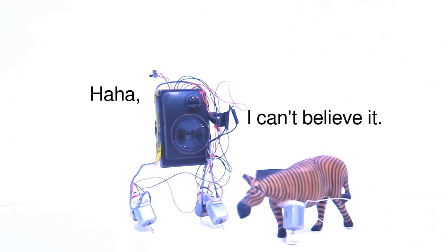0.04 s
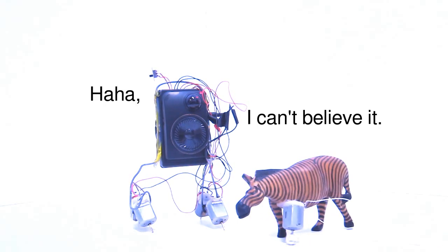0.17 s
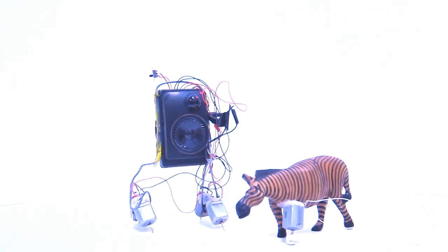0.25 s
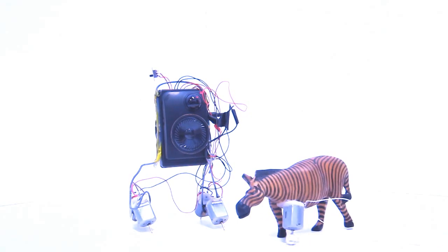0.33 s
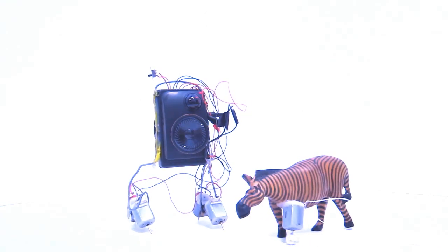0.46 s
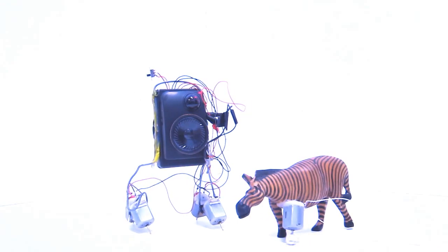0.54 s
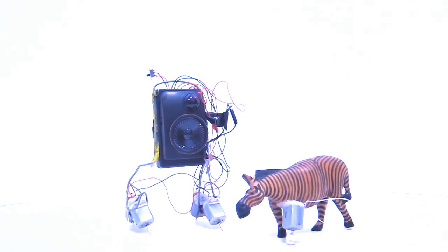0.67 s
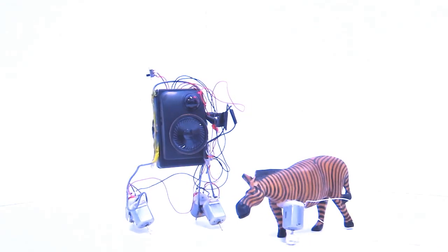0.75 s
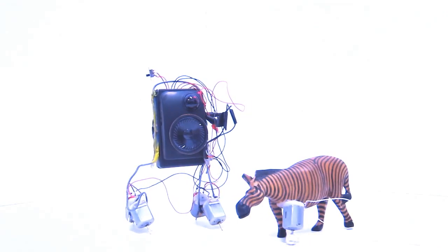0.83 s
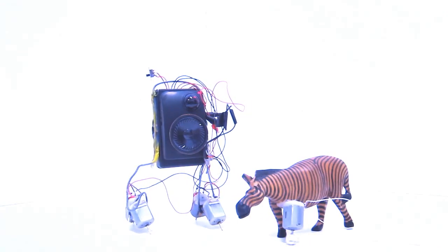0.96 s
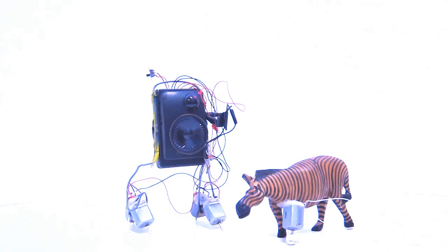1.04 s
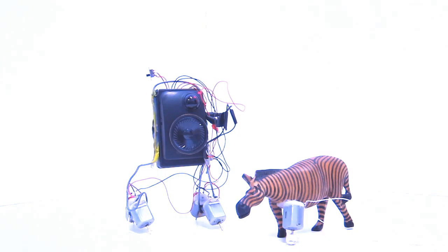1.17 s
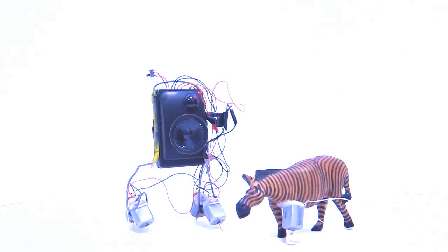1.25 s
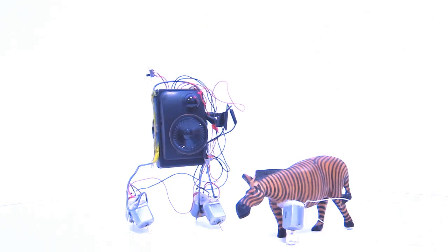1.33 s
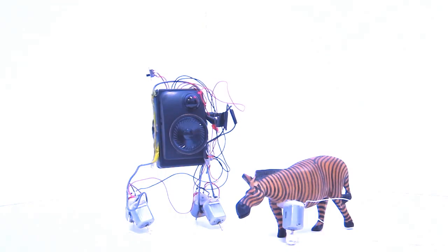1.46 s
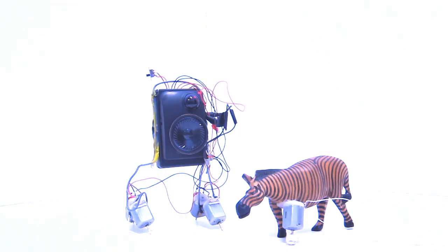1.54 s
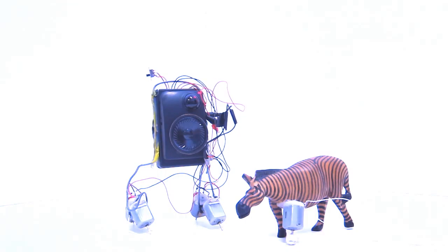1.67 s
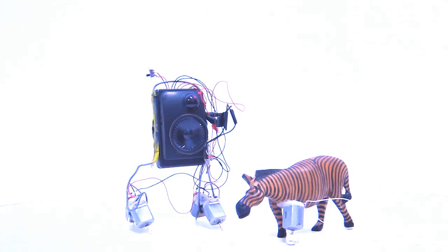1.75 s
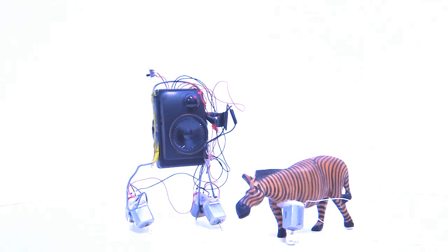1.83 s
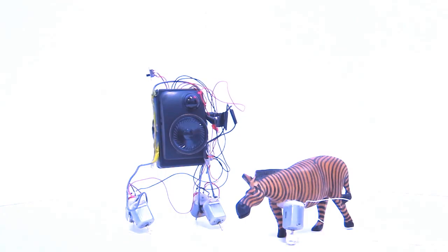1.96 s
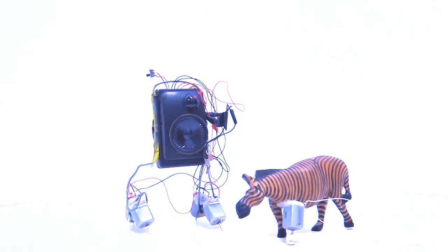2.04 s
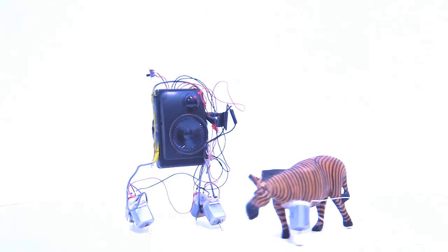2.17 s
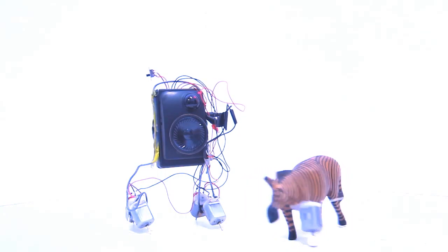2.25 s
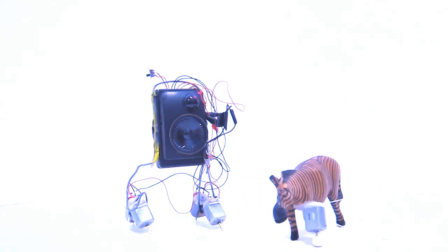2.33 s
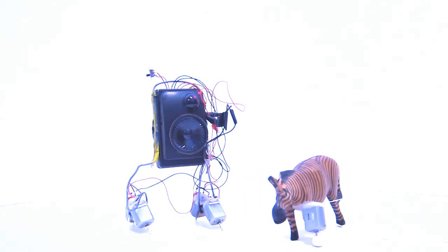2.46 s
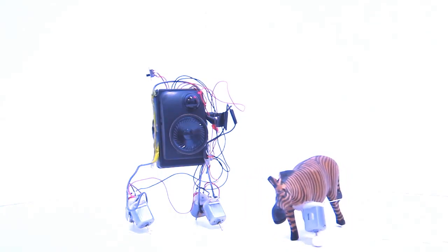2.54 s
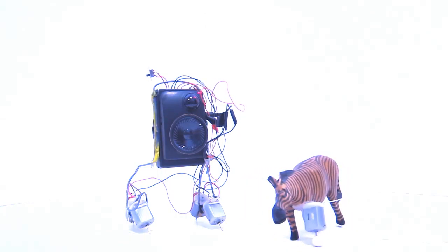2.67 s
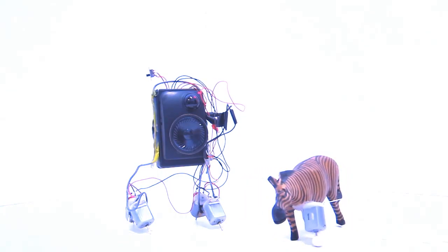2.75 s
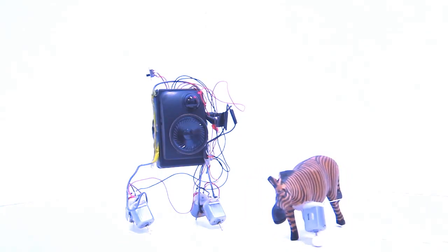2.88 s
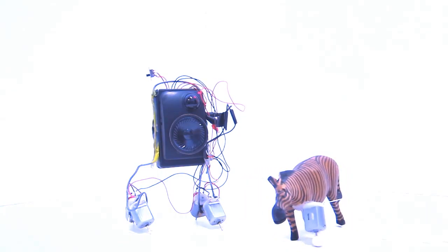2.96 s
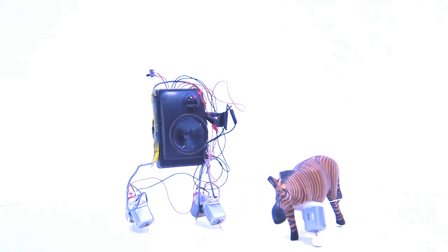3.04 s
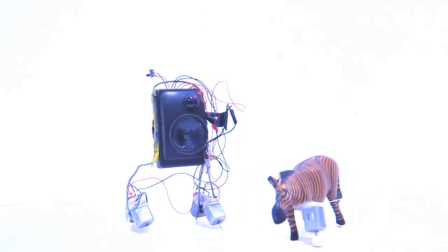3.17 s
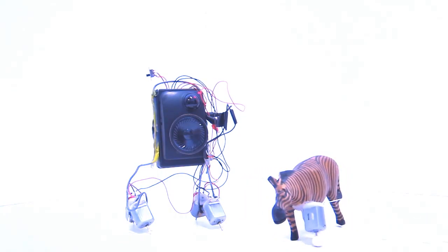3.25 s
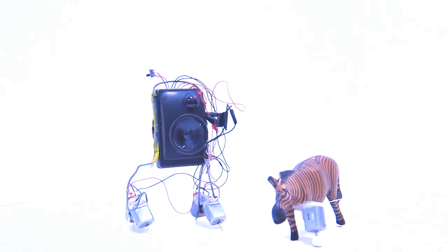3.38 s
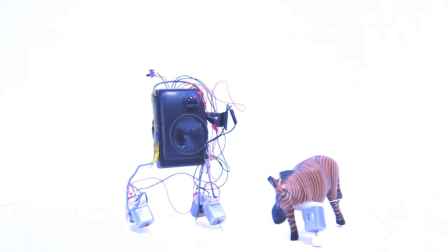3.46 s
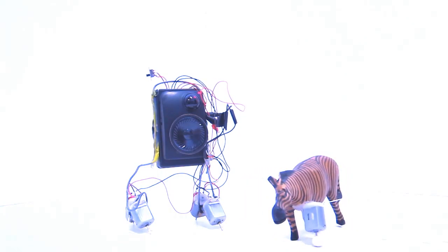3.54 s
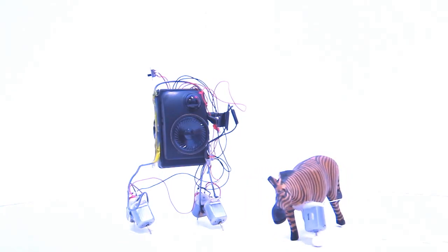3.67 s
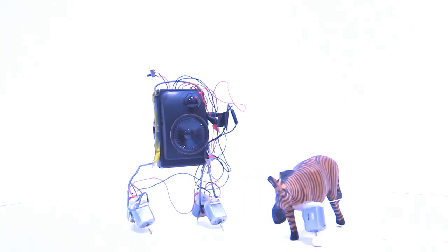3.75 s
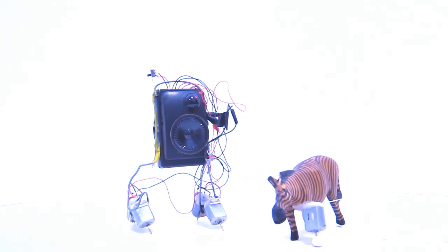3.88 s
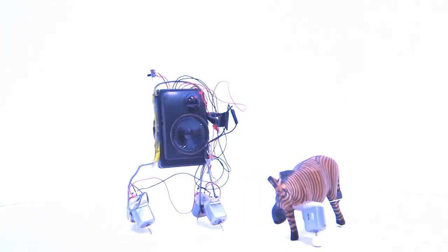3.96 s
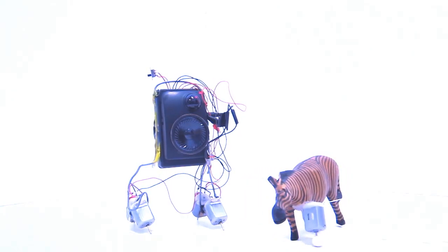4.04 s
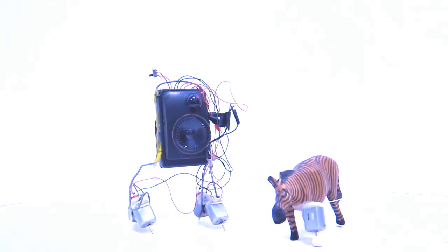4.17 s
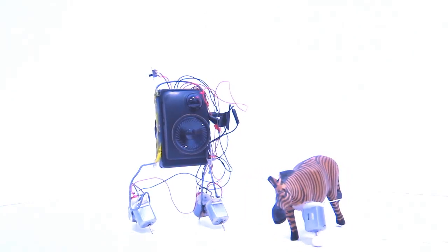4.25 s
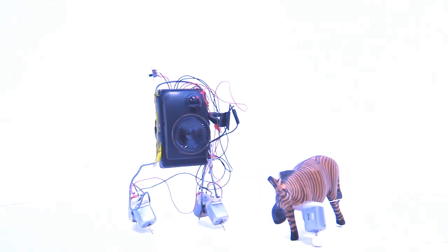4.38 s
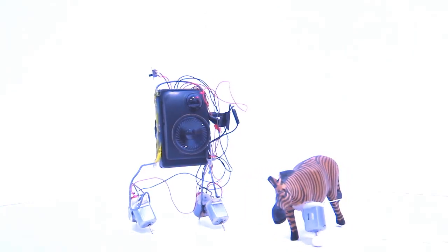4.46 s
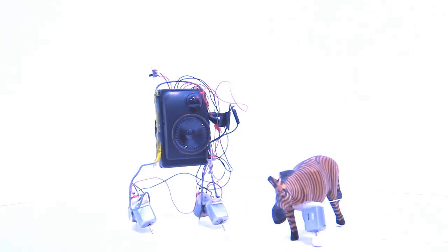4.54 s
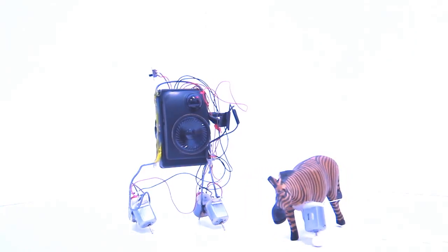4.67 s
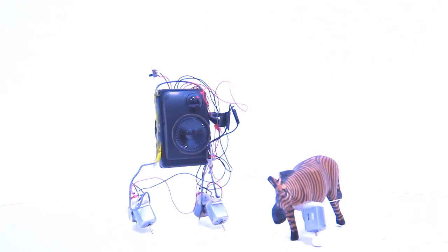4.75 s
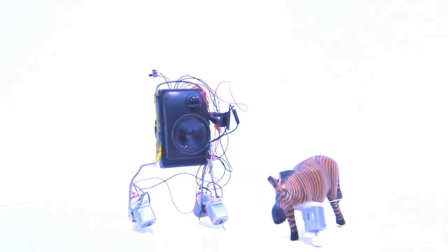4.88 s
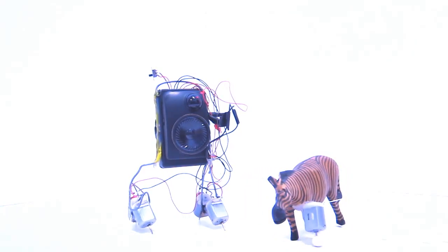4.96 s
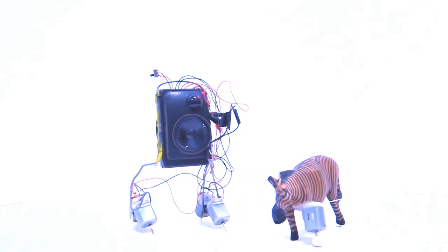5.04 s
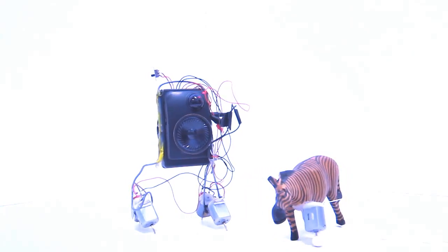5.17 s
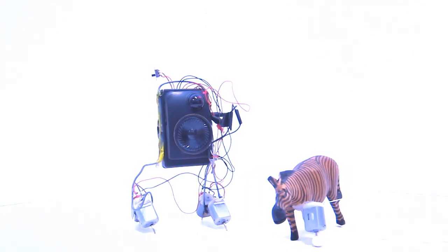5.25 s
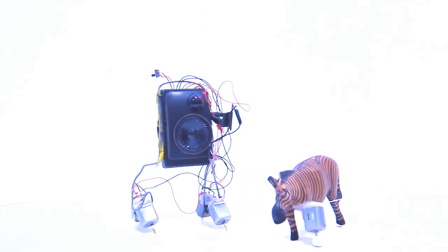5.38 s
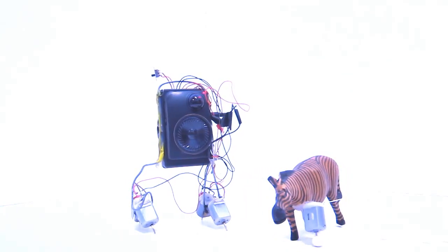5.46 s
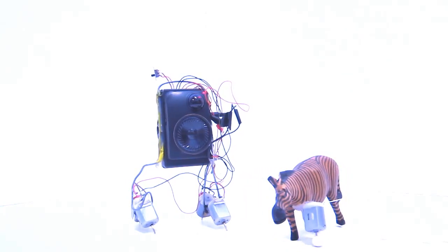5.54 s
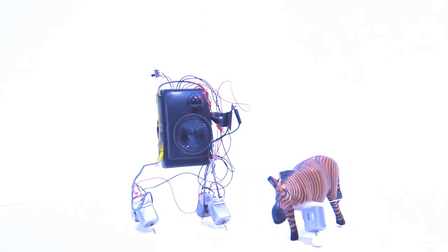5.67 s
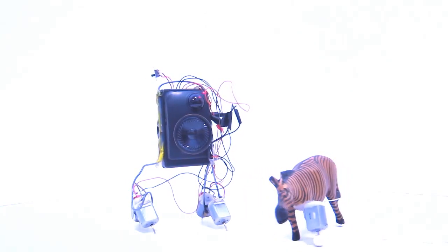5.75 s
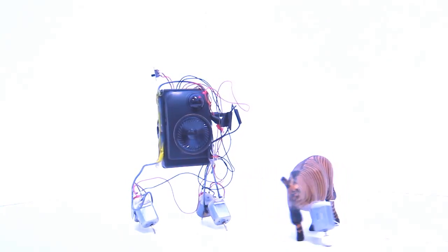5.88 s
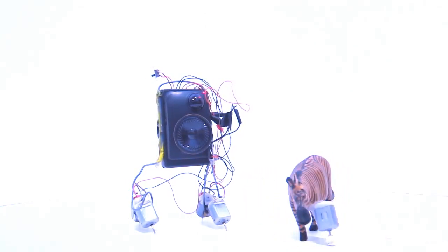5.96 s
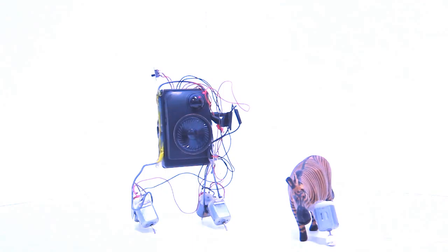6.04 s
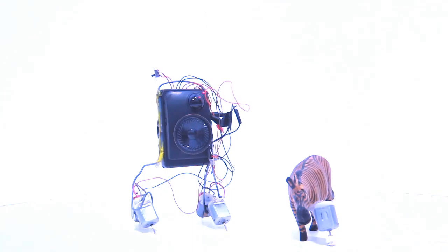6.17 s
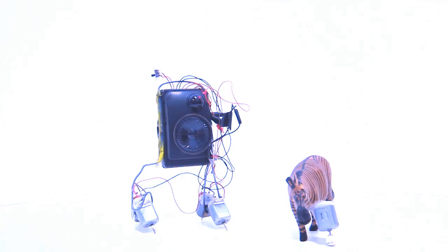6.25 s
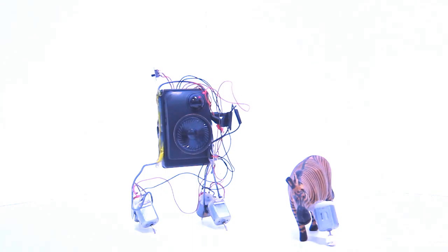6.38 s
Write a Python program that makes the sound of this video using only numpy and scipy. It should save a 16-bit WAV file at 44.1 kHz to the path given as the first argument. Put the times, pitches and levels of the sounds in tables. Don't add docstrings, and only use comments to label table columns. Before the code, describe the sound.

Close stereo microphones in a small, quiet room with a short echo. Right away, near 0.07 s, a hard plastic rap booms on a hollow table as a motor whirr cuts off. From about 0.4 to 0.6 s a motor buzzes while its foot rattles in dense, dry knocks, slowing into a few stray taps. Then quiet: soft air hiss, a very faint far fan with thin wavering whines, a tiny dull click at 1.6 s. From 2.14 to 2.57 s a toy animal hops and skids, giving uneven hard raps, scrapes and two weaker last taps. Quiet again. A very brief buzzing rattle comes at 3.65 s, another at 4.1 s, and a longer one from 4.95 to 5.12 s. Small wire ticks at 5.26 s and a faint squeak at 5.5 s. From 5.8 to 6 s the animal whirrs through a quick run of raps, then hiss until 6.4 s.

```python
import sys
import numpy as np
from scipy import signal
from scipy.fft import rfft, irfft
from scipy.io import wavfile
from scipy.ndimage import uniform_filter1d

SR = 44100
rng = np.random.default_rng(int(sys.argv[2]) if len(sys.argv) > 2 else 0)


def invert_db(level):
    return 10 ** (np.asarray(level, dtype=float) / 20)


def to_wav(sig):
    pcm = np.clip(np.atleast_2d(sig), -1, 1) * 32767
    pcm = np.round(pcm).astype(np.int16)
    wavfile.write(sys.argv[1], SR, pcm.T)


N = 282681


def animal():
    # start in seconds, rap level in dB, table boom level in dB.
    hops = [(0.0673, -2.5, -12), (.099, -38.5, -17.5), (2.140, -39, -34), (2.1738, -15.5, -11.5),
            (2.195, -23, -19.5), (2.2174, -13.5, -12), (2.24, -42, -23), (2.2599, -9, -8), (2.306, -10, -9),
            (2.4536, -20, -17), (2.5662, -29.5, -24.5), (5.8222, -20, -14), (5.846, -27, -18),
            (5.870, -25, -16.5), (5.8946, -17, -16), (5.924, -13.5, -11), (5.980, -35.5, -24)]
    # frequency in Hz, level in dB, t60 in seconds.
    shell_modes = [(734, 3.5, 0.013), (990, -18, 0.017), (1228, -17, 0.038), (1600, -10.5, 0.0076),
                   (1955, -9, 0.012), (2530, -7, 0.019), (2900, -3, 0.013), (3400, -8, 0.007)]
    # frequency in Hz, level in dB, t60 in seconds.
    table_modes = [(173, -2, 0.069), (196.1, 0, 0.14), (235.3, -8, 0.11), (299.6, -7.5, 0.21),
                   (378, 2, 0.067), (426, -16, 0.12), (495, -11, 0.082), (597, -21.5, 0.16),
                   (100, -44, .15)]
    # power on, full speed, power off in seconds, whirr in dB, table rumble in dB.
    hop_runs = [
        (-.02, .008, 0.032, -36, -27),
        (.07, .075, 0.068, -50, -29.5),
        (5.775, 5.812, 5.985, -46, -43),
    ]
    skid_runs = [
        (2.12, 2.142, 2.223, -43.5, -40.5),
        (2.2, 2.212, 2.224, -39, -50),
        (2.258, 2.268, 2.285, -44, -46),
        (2.3, 2.308, 2.357, -55.5, -44),
    ]
    # frequency in Hz, level in dB per Hz.
    whirr = [(500, -35.5), (800, -12), (1300, -8.5), (2200, -7.5), (2500, -10), (3300, -6), (4700, -18),
             (5500, -12), (7000, -19.5), (10800, -21.5), (15500, -33)]
    # frequency in Hz, width in Hz, level in dB over the whirr.
    motor_case = [(2500, 180, 17), (3050, 500, 6), (4200, 1200, 7)]
    # frequency in Hz, width in Hz, level in dB over the whirr.
    skid_case = [(2520, 180, 8.5), (4270, 1900, 4), (6700, 1360, 5.5)]
    soft_hz, harder_hz = 1175, 6400
    events = [(s, rap_db, boom_db, soft_hz + harder_hz * invert_db(rap_db)) for s, rap_db, boom_db in hops]
    out = blows(events, shell_modes, table_modes, snap_db=2.5, snap_turns=5.44, crackle_db=-12,
                chatter=2.0, boom_s=0.0025, echo_db=0.5)
    out += motor(hop_runs, whirr, motor_case, table_modes, turns_hz=160.0, rough=0.26,
                 sag_db=-6.5, coast_db_per_s=394)
    out += motor(skid_runs, whirr, skid_case, table_modes, turns_hz=148.4, rough=0.27,
                 sag_db=-5.0, coast_db_per_s=356)
    return out


def box():
    # start in seconds, rap level in dB, table boom level in dB.
    near_knocks = [(.398, -16, -13.5), (.4064, -15.5, -18.5), (.429, -9, -7.5), (.4427, -16, -18.5),
                   (.5407, -21, -19.5), (.5652, -18.5, -13), (.6093, -25, -23.5)]
    far_knocks = [(3.6506, -42, -34), (3.667, -31, -23), (4.1032, -41, -29), (4.118, -17.5, -16),
                  (4.129, -29, -20.5), (4.949, -26, -25), (4.9581, -24.5, -19.5), (4.9837, -12.5, -17),
                  (4.9969, -22, -13), (5.1093, -15, -20)]
    # first, strongest, last knock in seconds, rap level in dB, table boom in dB.
    near_rolls = [
        (.4537, .49, .527, -12, -12),
    ]
    far_rolls = [
        (3.6761, 3.683, 3.704, -10, -18.5),
        (4.139, 4.144, 4.166, -8, -14.5),
        (5.013, 5.045, 5.122, -8.5, -11),
    ]
    # power on, full speed, power off in seconds, whirr in dB, table rumble in dB.
    knock_runs = [
        (.37, .41, 0.55, -31.5, -36),
        (3.62, 3.675, 3.707, -38, -42),
        (4.05, 4.145, 4.157, -27, -32),
        (4.92, 4.99, 5.085, -25.5, -38),
    ]
    # frequency in Hz, level in dB, t60 in seconds.
    near_shell = [(1036, -16, 0.04), (1647, -9, 0.02), (1973, 4.5, 0.012), (2130, -0.5, 0.02),
                  (2530, -8.5, 0.025), (3360, -8.5, 0.016), (4580, -6.5, 0.0072)]
    far_shell = [(902, -12.5, 0.045), (1817, 5.5, 0.016), (2140, -6.5, 0.018), (2530, 3.5, 0.014),
                 (2920, -7, 0.027), (3590, -11, 0.015), (4920, 2.5, 0.0067)]
    # frequency in Hz, level in dB, t60 in seconds.
    near_table = [(181.6, -16, 0.11), (214, -13.5, 0.16), (308, -10.5, 0.11), (347.7, 3, 0.055),
                  (548, -14.5, 0.06), (718, -17, 0.031)]
    far_table = [(56, -40, 0.071), (105, -2.5, 0.08), (158.5, -2, 0.11), (216, -2.5, 0.051),
                 (329.7, -2.5, 0.077), (516, -4.5, 0.026)]
    # frequency in Hz, level in dB per Hz.
    whirr = [(410, -7), (700, -6), (1190, -9.5), (1830, -13.5), (2690, -10.5), (4030, -19.5), (4640, -22),
             (6680, -24.5), (8110, -38), (9720, -27), (15500, -45)]
    # frequency in Hz, width in Hz, level in dB over the whirr.
    motor_case = [(10500, 600, 3)]
    near_hard_hz, far_hard_hz = 4760, 5960
    near = [*near_knocks, *rolled(near_rolls, turn_s=.0104, jitter_s=.0006,
                                  enter_db=-1.0, leave_db=-4.5, uneven_db=3.5)]
    far = [*far_knocks, *rolled(far_rolls, turn_s=.0107, jitter_s=.0007,
                                enter_db=-2.0, leave_db=-36.5, uneven_db=2.5)]
    out = blows([(*knock, near_hard_hz) for knock in near], near_shell, near_table, snap_db=-10.5,
                snap_turns=5.7, crackle_db=7.0, chatter=4.6, boom_s=0.0019, echo_db=-2.5)
    out += blows([(*knock, far_hard_hz) for knock in far], far_shell, far_table, snap_db=-5.0,
                 snap_turns=13.8, crackle_db=1.5, chatter=0.69, boom_s=0.00022, echo_db=-4)
    out += motor(knock_runs[1:], whirr, motor_case, far_table, turns_hz=94.1, rough=0.56,
                 sag_db=-7.5, coast_db_per_s=230)
    out += motor(knock_runs[:1], whirr, [], near_table, turns_hz=93.7, rough=0.33,
                 sag_db=-6, coast_db_per_s=230.5)
    return out


def rolled(rolls, turn_s, jitter_s, enter_db, leave_db, uneven_db):
    out = []
    chances = rng.standard_normal((len(rolls), 12, 3))
    for (first, top, last, rap_db, boom_db), chance in zip(rolls, chances):
        for s, (a, b, c) in zip(np.arange(first, last + turn_s / 2, turn_s), chance):
            if s < top:
                db = enter_db * ((top - s) / (top - first)) ** 2
            else:
                db = leave_db * ((s - top) / (last - top)) ** 2
            start_s = s + jitter_s * a * (s > first)
            out.append((start_s, rap_db + db + uneven_db * b, boom_db + 0.45 * db + uneven_db * c))
    return out


def blows(events, shell, table, snap_db, snap_turns, crackle_db, chatter, boom_s, echo_db):
    out, t = np.zeros(N), np.arange(900) / SR
    echo = np.cos(2 * np.pi * 235 * (t - .0105)) * np.exp(-((t - .0115) / 0.0041) ** 2)
    chance = rng.random((len(events), 16, 3))
    crackle_shape = np.exp(-t / 0.0036) * (1 - np.exp(-t / 0.0043)) / 2
    crackle = rng.standard_normal((len(events), 900)) * crackle_shape
    for (s, rap_db, boom_db, hard_hz), c, hiss in zip(events, chance, crackle):
        u = t * hard_hz / snap_turns
        snap = np.sin(2 * np.pi * 1.89 * np.sqrt(u)) * np.exp(-u)
        touches = chatter * hiss ** 3 + (t == 0)
        rap = signal.fftconvolve(ring(shell, 0.0038, c), touches / np.linalg.norm(touches))
        soft = signal.butter(3, min(hard_hz, 15000), fs=SR, output="sos")
        contact = signal.sosfilt(soft, invert_db(snap_db) * snap + invert_db(crackle_db) * hiss)
        add(out, s, invert_db(rap_db - 0.5) * contact)
        add(out, s, invert_db(rap_db - 2) * rap)
        add(out, s, invert_db(boom_db + 3.0) * ring(table, boom_s, c[8:]))
        add(out, s, invert_db(boom_db + echo_db) * echo)
    return out


def ring(modes, rise_s, chance):
    t = np.arange(SR // 3) / SR
    x = np.zeros(len(t))
    for (hz, db, t60_s), (a, b, c) in zip(modes, chance):
        decay = invert_db(db + 9.1 * (c - .5) - 60 * t / t60_s)
        x += decay * np.sin(2 * np.pi * (hz * (1 + 0.1 * (a - .5)) * t + b))
    x = x * (1 - np.exp(-t / rise_s))
    return x / abs(x).max()


def motor(runs, whirr, case, table, turns_hz, rough, sag_db, coast_db_per_s):
    wander = uniform_filter1d(rng.standard_normal(N), size=400)
    turns = np.cumsum(turns_hz * (1 + 3 * wander)) / SR
    brush = coloured(whirr)
    hiss = brush.copy()
    for hz, width_hz, db in case:
        hiss += invert_db(db) * resonate(resonate(brush, hz, width_hz), hz, width_hz)
    hiss *= 1 - rough + 1.72 * rough * np.cos(np.pi * turns) ** 4
    push = coloured([(30, -11), (80, -1.5), (600, -18.0), (1200, -36.5), (20000, -77.5)])
    rumble = evened(sum(invert_db(db) * resonate(push, hz, 9.7 / t60_s) for hz, db, t60_s in table))
    hiss_gain = running(runs, column=3, start_db=-37.5, sag_db=sag_db, coast_db_per_s=coast_db_per_s)
    rumble_gain = running(runs, column=4, start_db=-19, sag_db=0, coast_db_per_s=0.9 * coast_db_per_s)
    return invert_db(1.5) * hiss_gain * hiss + invert_db(5.0) * rumble_gain * rumble


def running(runs, column, start_db, sag_db, coast_db_per_s):
    t, out = np.arange(N) / SR, np.zeros(N)
    for row in runs:
        on, full, off = np.sort(row[:3])
        levels_db = [start_db, 0, sag_db, sag_db - coast_db_per_s]
        shape_db = np.interp(t, [on, full, off, off + 1], levels_db, -150, -150)
        out += invert_db(row[column] + shape_db)
    return uniform_filter1d(out, size=350)


def ticks():
    # start in seconds, level in dB, frequency in Hz, decay length in seconds.
    wire_ticks = [
        (1.614, -35, 1450, .0015),
        (5.257, -32, 1300, .001),
        (5.485, -48, 2260, .04),
        (.685, -60, 11400, .02),
    ]
    out, t = np.zeros(N), np.arange(4000) / SR
    for s, db, hz, length_s in wire_ticks:
        shape = np.exp(-t / length_s) * (1 - np.exp(-4 * t / length_s))
        add(out, s, invert_db(db) * np.sin(2 * np.pi * hz * t) * shape)
    return out


def spread(x):
    # frequency in Hz, level in dB.
    scatter_db = [(40, -10), (150, -21), (400, -6), (2000, -11), (5000, 1), (12000, 3)]
    scatter = coloured(scatter_db)[:300] * np.exp(-np.arange(300) / 85.0)
    scatter = np.concatenate([-scatter[::-1], [0], scatter])
    return np.array([[1], [-1]]) * signal.oaconvolve(x, scatter / np.linalg.norm(scatter), "same")


def room(x):
    turn = np.pi * np.arange(N) / SR / .07
    return sum(echoes(x * np.sqrt(2 / 3) * np.cos(turn + k * np.pi / 3)) for k in range(3))


def echoes(x):
    # frequency in Hz, t60 in seconds.
    decay_s = [(100, 0.33), (400, 0.23), (2000, 0.16), (6000, 0.24), (15000, 0.094)]
    # frequency in Hz, level in dB.
    echo_db = [(100, -6.5), (1000, -3), (4000, 0.5), (10000, -16)]
    # frequency in Hz, likeness from 0 to 1.
    likeness = [(60, 1), (200, 0.94), (1000, 0.8), (3000, 0.033), (8000, .02)]
    taps = np.zeros((2, SR // 2))
    at = np.arange(40, SR // 2 - 20, 20) + rng.integers(0, 20, (2, (SR // 2 - 41) // 20))
    np.put_along_axis(taps, at, rng.choice([-1., 1.], at.shape), 1)
    hz, t, z = signal.stft(taps, SR, nperseg=256)
    same = np.clip(read(likeness, hz), 0, 1)[:, None]
    z[1] = same * z[0] + np.sqrt(1 - same ** 2) * z[1]
    z *= invert_db(read(echo_db, hz)[:, None] - 60 * t / read(decay_s, hz)[:, None])
    tail = signal.istft(z, SR, nperseg=256)[1] / np.sqrt(SR / 20 * 0.033)
    return signal.fftconvolve(x[None], tail, axes=1)[:, :N]


def fan():
    # frequency in Hz, level in dB.
    order_db = [(600, -87.5), (1000, -72.5), (1600, -77), (2000, -76.5), (2500, -79.5), (3430, -78.5),
                (3900, -97)]
    # frequency in Hz, level in dB, wavering in dB.
    tones = [(681, -73.5, 13.5), (1607, -69.5, 7), (3465, -69, 1), (8805, -71.5, 1.5)]
    # on in seconds, off in seconds, frequency in Hz, level in dB.
    whines = [(1.05, 2.1, 1940, -66.5), (4.75, 4.95, 1985, -63), (5.3, 5.59, 1953, -66.5),
              (5.95, 6.5, 1943, -59), (.28, .55, 1994, -66), (1.25, 2.103, 2015, -61.5),
              (2.5, 3.44, 2003, -60.5), (3.7, 3.95, 1990, -65), (4.3, 4.75, 1994, -62),
              (4.95, 6.5, 2027, -62)]
    fan_hz, fade_s, off_db = 55.36, .08, -17
    t = np.arange(N) / SR
    lines = [(k * fan_hz, read(order_db, k * fan_hz), 3) for k in range(11, 71)] + [*tones]
    for on, off, hz, db in whines:
        outside = np.clip(np.maximum(on - t, t - off) / fade_s, 0, 2)
        lines.append((hz, db + off_db * outside, 2.5))
    out = np.zeros(N)
    for (hz, db, waver_db), (a, b, c) in zip(lines, rng.random((len(lines), 3))):
        waver = np.sin(2 * np.pi * ((.5 + 2 * b) * t + c))
        out += invert_db(-0.5 + db + waver_db * waver) * np.sin(2 * np.pi * (hz * t + a) + 0.84 * waver)
    return out


def air():
    # frequency in Hz, level in dB per Hz.
    hiss_db = [(15, -43.5), (25, 4.5), (188, -4), (445, -11.5), (1030, -15), (1110, -15), (1850, -18),
               (2010, -19), (2360, -21), (3440, -22.5), (6750, -31.5), (8150, -41.5), (8830, -34),
               (15500, -35.5)]
    # time in seconds, level in dB.
    swell_db = [(0, -2), (.76, -3.5), (.92, -0.5), (3.9, 1.5), (6.41, 0.05)]
    # frequency in Hz, likeness from 0 to 1.
    likeness = [(60, 0.75), (180, 0.42), (550, 0.38), (1650, 0.11), (4970, 0.073), (15000, 0.083)]
    frames, hz = N // 256 + 5, np.fft.rfftfreq(1024, 1 / SR)
    a, b, c, d, patches = rng.standard_normal((frames, 513, 5)).T
    patches = uniform_filter1d(patches, size=12, axis=0)
    patches = evened(uniform_filter1d(patches, size=20, axis=1))
    same, left = np.clip(read(likeness, hz), -1, 1)[:, None], a + 1j * b
    z = np.array([left, same * left + np.sqrt(1 - same ** 2) * (c + 1j * d)])
    z *= invert_db(read(hiss_db, hz)[:, None] + 1.18 * patches)
    x = evened(signal.istft(z, nperseg=1024, noverlap=768)[1][:, :N])
    return invert_db(-49 + np.interp(np.arange(N) / SR, *np.transpose(swell_db))) * x


def evened(x):
    return x / np.sqrt(np.mean(x ** 2) + 1e-20)


def read(points, hz):
    f, value = np.transpose(points)
    return np.interp(np.log(hz + 1), np.log(f + 1), value)


def resonate(x, hz, width_hz):
    r = np.exp(-np.pi * width_hz / SR)
    return 2 * signal.lfilter([1 - r], [1, -r * np.exp(2j * np.pi * hz / SR)], x).real


def coloured(points):
    spectrum = rfft(rng.standard_normal(N)) * invert_db(read(points, np.fft.rfftfreq(N, 1 / SR)))
    return evened(irfft(spectrum, N))


def add(mix, s, sound):
    part = mix[round(s * SR):][:len(sound)]
    part += sound[:len(part)]


def sides(left_db, right_db):
    return invert_db([[left_db], [right_db]])


def scene():
    hopper, chatterer = animal(), box()
    toys = hopper + chatterer
    direct = hopper * sides(-.3, .3) + (chatterer + ticks()) * sides(-.35, .35)
    background = fan() * sides(-1.1, .9) + air() * sides(-.4, .4)
    return direct + spread(toys) + room(toys) + background


def low_pass(x):
    return signal.sosfilt(signal.butter(12, 15690, fs=SR, output="sos"), x)


def record(dry):
    notch_hz = (7850, 8600, 15700)
    power_db = 10 * np.log10(abs(uniform_filter1d((dry ** 2).mean(0), size=800)) + 1e-12)
    fall_db = np.arange(N) * 3.8 / SR
    held_db = np.maximum.accumulate(power_db + fall_db) - fall_db
    over_db = np.maximum(held_db + 19, 0)
    ducked = dry * sides(-.35, .35) / invert_db(0.034 * uniform_filter1d(over_db, size=400))
    bass_cut = signal.butter(2, 50, "high", fs=SR, output="sos")
    ducked = signal.sosfilt(bass_cut, ducked)
    gap = signal.firwin(601, notch_hz, window=("kaiser", 5), fs=SR)
    clipped = np.clip(signal.oaconvolve(ducked, gap[None], "same"), -1, 1)
    return low_pass(clipped)


dry = scene()
out = record(dry)
to_wav(out)
```